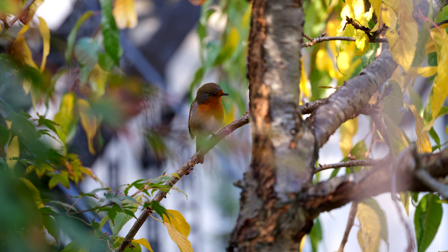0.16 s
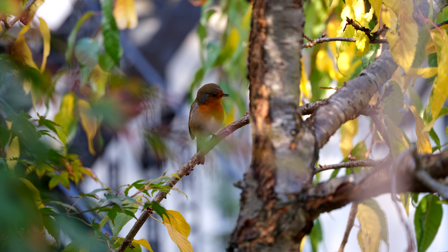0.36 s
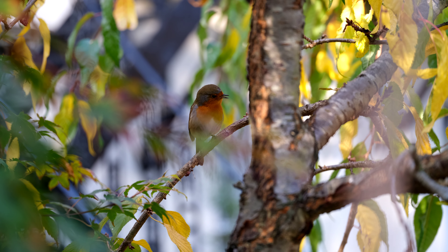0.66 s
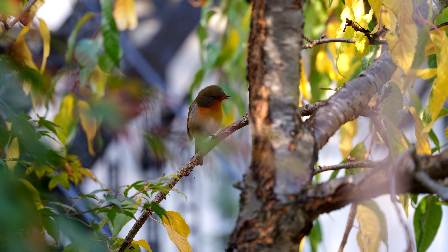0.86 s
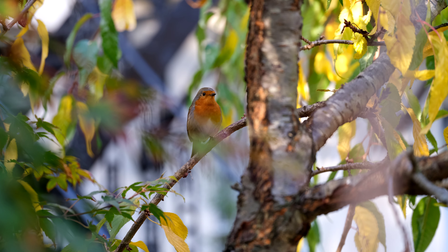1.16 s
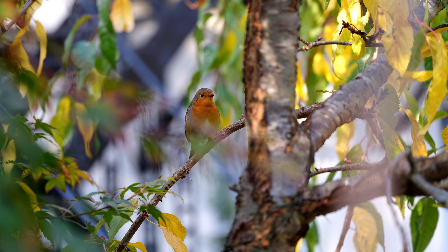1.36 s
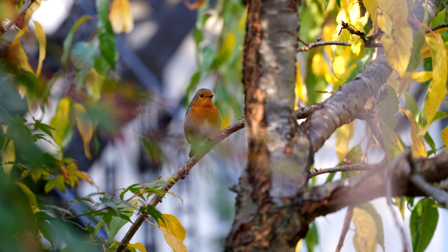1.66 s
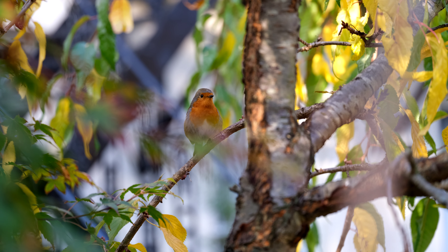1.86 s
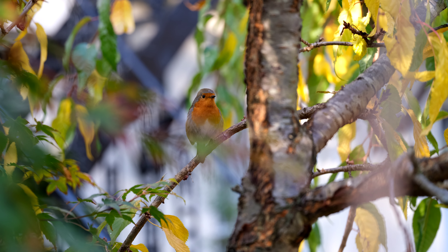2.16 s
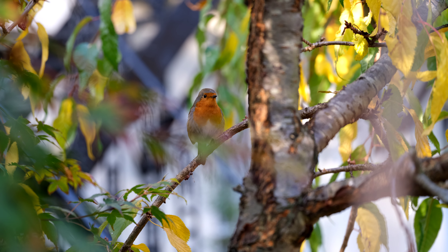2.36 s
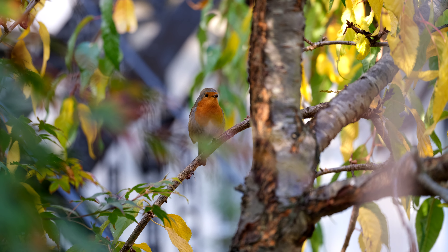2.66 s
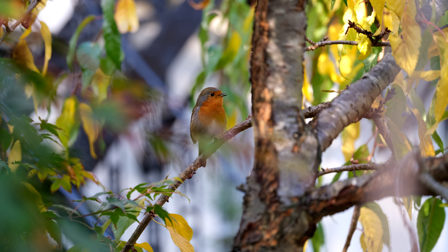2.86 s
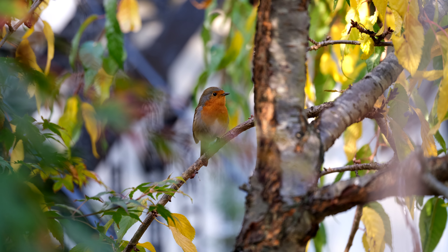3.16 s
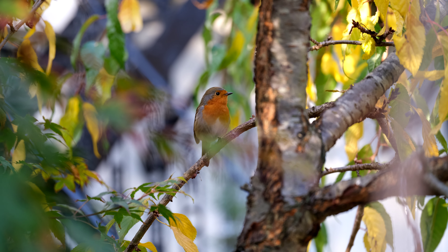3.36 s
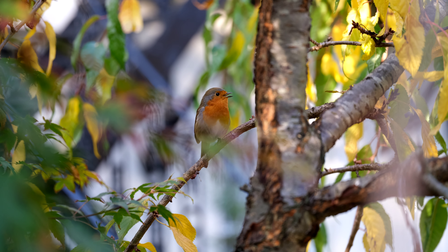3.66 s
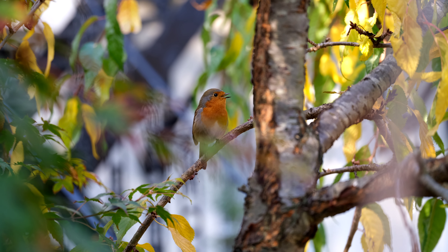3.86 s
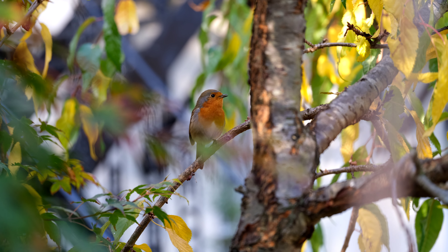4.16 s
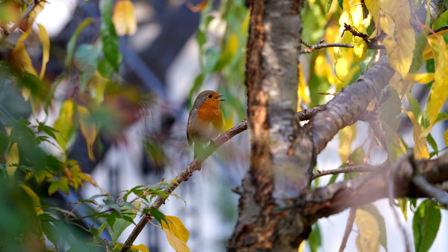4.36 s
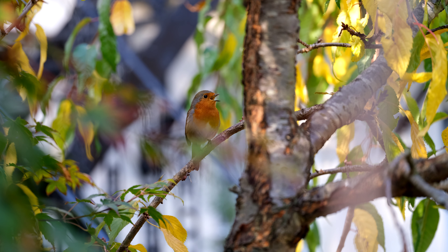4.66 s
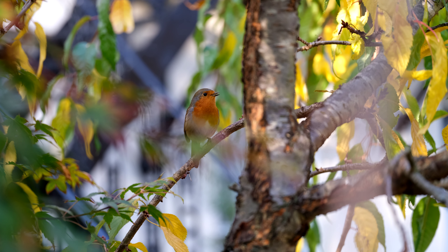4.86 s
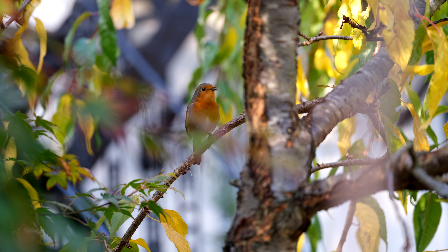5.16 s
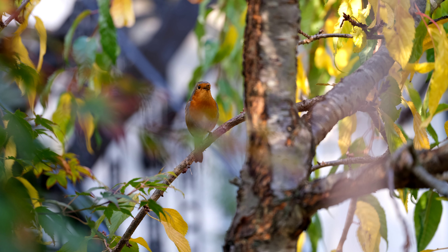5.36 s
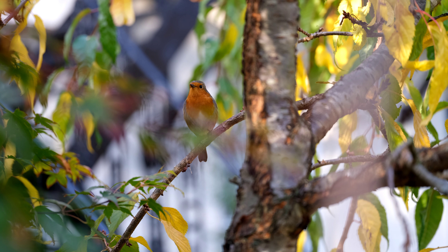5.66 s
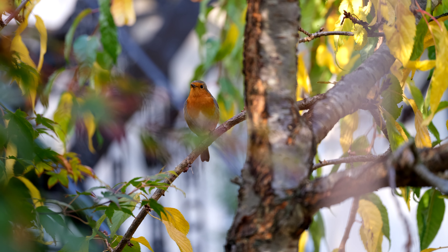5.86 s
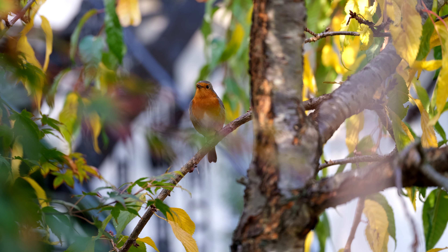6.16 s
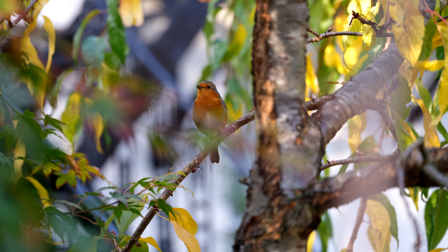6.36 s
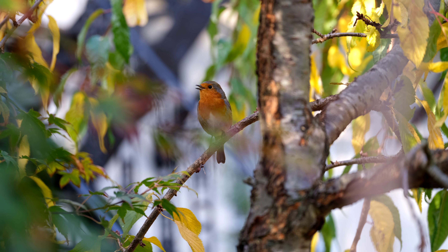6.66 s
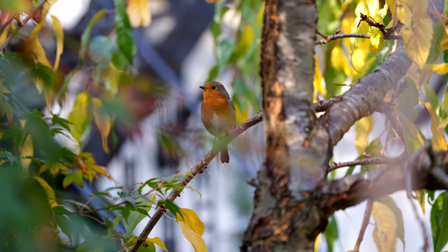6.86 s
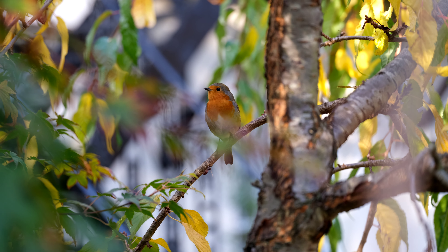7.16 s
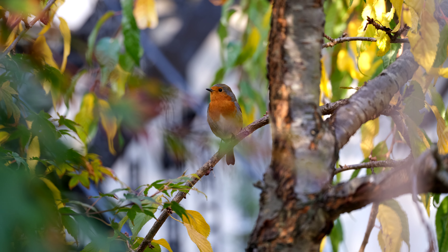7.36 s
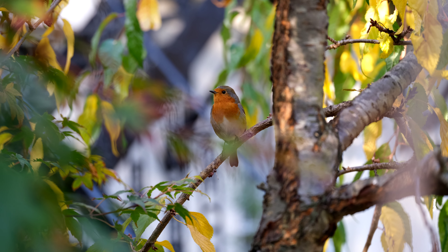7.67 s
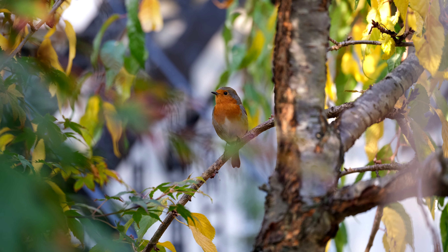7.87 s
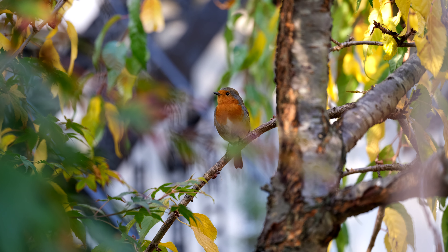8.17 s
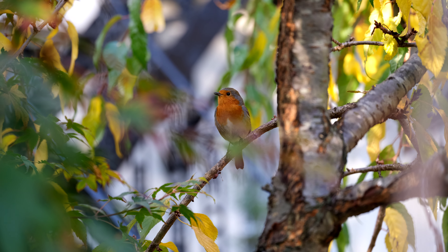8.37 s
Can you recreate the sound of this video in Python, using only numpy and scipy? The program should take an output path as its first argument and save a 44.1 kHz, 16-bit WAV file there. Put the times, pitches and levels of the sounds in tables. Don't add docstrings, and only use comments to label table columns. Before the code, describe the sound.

A robin a few metres away, slightly left, sings quick clipped whistles and squeaky twitters in short phrases separated by pauses. A thin high trill leads into a louder, lower warble, then a few sparse piping notes. Leaves and walls add light echo. Behind it lie steady traffic wash, a faint low idling engine, distant chirping birds and one far double boom, all picked up in stereo by a camera's microphones.

```python
import sys
import numpy as np
from scipy import signal
from scipy.fft import rfft, irfft
from scipy.io import wavfile
from scipy.ndimage import uniform_filter1d

SR = 44100
rng = np.random.default_rng(int(sys.argv[2]) if len(sys.argv) > 2 else 0)


def magnitude_from_level(level_db):
    exponent = np.asarray(level_db, float) / 20
    return 10 ** exponent


def persist_wave(psi):
    counts = np.round(np.clip(psi, -1, 1) * 32767).astype(np.int16)
    wavfile.write(sys.argv[1], SR, np.atleast_2d(counts).T)


N = 375732


def evened(x):
    return x / np.sqrt(np.mean(x ** 2) + 1e-20)


def read(points, hz):
    f, value = np.transpose(points)
    return np.interp(np.log(hz + 1), np.log(f + 1), value)


def slow(per_s, count):
    z = rfft(rng.standard_normal((count, N)))
    smooth = np.exp(-(np.fft.rfftfreq(N, 1 / SR) / per_s) ** 2)
    return evened(irfft(z * smooth, N))


def resonate(x, hz, width):
    turn = np.exp(2j * np.pi * np.cumsum(hz * np.ones(len(x))) / SR)
    r = np.exp(-np.pi * width / SR)
    return 2 * (turn * signal.lfilter([1 - r], [1, -r], x / turn)).real


def town():
    # (frequency [Hz], density [dB per Hz])
    wash_spectrum = [(25, -10.5), (66, -0.5), (134, -6.5), (500, -13), (900, -12.5), (1560, -14.5),
                     (2200, -13), (2500, -24), (3100, -24), (4000, -33.5), (6000, -36), (8500, -45),
                     (14700, -52.5), (16000, -66)]
    # (frequency [Hz], left-right likeness [-1..1])
    likeness = [(60, 0.95), (240, 0.9), (950, 0.56), (3770, 0.13), (15000, 0.01)]
    frames, hz = N // 256 + 5, np.fft.rfftfreq(1024, 1 / SR)
    a, b, c, d, patches = rng.standard_normal((frames, 513, 5)).T
    patches = uniform_filter1d(uniform_filter1d(patches, 12, 0), 20, 1)
    patches = evened(patches)
    same = np.clip(read(likeness, hz), -1, 1)[:, None]
    left = a + 1j * b
    right = same * left + np.sqrt(1 - same ** 2) * (c + 1j * d)
    z = np.array([left, right])
    z *= magnitude_from_level(read(wash_spectrum, hz)[:, None] + 0.69 * patches)
    wash = evened(signal.istft(z, nperseg=1024, noverlap=768)[1][:, :N])
    return magnitude_from_level(-46) * magnitude_from_level([[.3], [-.3]]) * wash


def engine():
    # (time [s], level [dB])
    idle = [
        (0, -51.5),
        (2.5, -44.5),
        (7.1, -49.5),
        (8.52, -41),
    ]
    throb = resonate(resonate(rng.standard_normal(N), 52, 17), 52, 17)
    level_db = np.interp(np.arange(N) / SR, *np.transpose(idle)) - 6.5
    return magnitude_from_level(level_db) * evened(throb)


def boom():
    # (time [s], thud level [dB], rattle over thud [dB], rise [s], t60 [s])
    blows = [
        (2.913, -36.5, -10.5, 0.0084, 3.05),
        (3.149, -40, 2, 0.13, 1.76),
    ]
    # (frequency [Hz], width [Hz], level [dB])
    modes = [(214, 160, 7.5), (141.5, 13.6, 0.5), (308.5, 450, -8)]
    echoes = rng.standard_normal((2, N)) * magnitude_from_level(1.2 * slow(50, count=2))
    thud = np.zeros(N)
    for f, width, db in modes:
        thud += magnitude_from_level(db) * evened(resonate(resonate(echoes[0], f, width), f, width))
    thud = evened(thud)
    rattle_band = signal.butter(3, [400, 1600], "band", fs=SR, output="sos")
    rattle = evened(signal.sosfilt(rattle_band, echoes[1]))
    out = np.zeros(N)
    for s, thud_db, rattle_db, rise_s, t60 in blows:
        age = np.maximum(np.arange(N) / SR - s, 0)
        roll = magnitude_from_level(thud_db - 60 * age / t60) * np.tanh(age / rise_s)
        out += roll * (thud + magnitude_from_level(rattle_db) * rattle)
    return out


def garden(x, gap_s, size=1):
    # (frequency [Hz], t60 [s])
    ringing = [(2000, 0.26), (4000, 0.58), (8000, 0.25)]
    taps = np.zeros((2, SR // 2))
    at = np.arange(0, SR // 2 - 20, 20) + rng.integers(0, 20, (2, (SR // 2 - 1) // 20))
    np.put_along_axis(taps, at, rng.choice([-1., 1.], at.shape), 1)
    taps *= np.arange(SR // 2) > gap_s * SR
    taps[1] = 0.087 * taps[0] + 1.02 * taps[1]
    hz, t, z = signal.stft(taps, SR, nperseg=128)
    decay = magnitude_from_level(-60 * t / (size * read(ringing, hz)[:, None]))
    tail = signal.istft(z * decay, SR, nperseg=128)[1]
    return signal.fftconvolve(x[None], tail / np.linalg.norm(tail[0]), axes=1)[:, :N]


def voice(turn, pitch, db, overtone_db):
    step_db = np.clip(-.5 * (db + 9.5), 2, 20)
    overtones = 0
    for k in range(2, 6):
        k_db = np.minimum(overtone_db, -30 if k > 2 else 0) + .4 * (db + 28) - step_db * (k - 2)
        overtones = overtones + magnitude_from_level(k_db) * np.cos(k * turn) * (k * pitch < SR / 2)
    return np.cos(turn) + overtones


def whistles(rows, edge_s, taper, flutter_db, waver, overtone_db, breakup=0):
    out = np.zeros(N)
    flutter, drift = slow(210, count=2)
    rasp = magnitude_from_level(-48.0) * rng.standard_normal(N)
    swell_db = 4
    for (s, length, *hz, db), start in zip(rows, rng.random(len(rows))):
        at = np.arange(round((s - edge_s) * SR), min(round((s + length + edge_s) * SR), N))
        glide = np.polyfit(np.linspace(0, 1, len(hz)), hz, len(hz) - 1)
        along = np.clip((at / SR - s) / length, -.06, 1.06)
        pitch = np.polyval(glide, along) * (1 + waver * drift[at])
        turn = 2 * np.pi * (np.cumsum(pitch) / SR + start)
        fade = signal.windows.tukey(len(at), np.clip(taper / (length + 2 * edge_s), 0, 1))
        wobble_db = flutter_db + breakup * np.clip(-23.5 - db, 0, 16)
        push_db = db + wobble_db * flutter[at] + swell_db * np.linspace(-.5, .5, len(at))
        out[at] += magnitude_from_level(push_db) * fade * (voice(turn, pitch, db, overtone_db[at]) + rasp[at])
    return out


def flock(count=480):
    # (time [s], level [dB])
    near_chirps = [
        (1.6626, -52),
        (1.7858, -56),
        (2.8155, -47.5),
        (6.94, -54),
    ]
    when, long, low, top, size = rng.random((count, 5)).T
    s = .01 + when * (N / SR - .1)
    db = np.minimum(-66 - 4 * np.log(size), -55)
    s[:len(near_chirps)], db[:len(near_chirps)] = np.transpose(near_chirps)
    low_hz = 1720 + 200 * low
    top_hz = 1920 + 380 * top ** 2
    rows = np.transpose([s, .022 + .025 * long, low_hz, top_hz, low_hz, db])
    song = whistles(rows, edge_s=.004, taper=0.0052, flutter_db=2.0, waver=0.0093,
                    overtone_db=np.full(N, -60.))
    return magnitude_from_level(5.5) * song + magnitude_from_level(-9.5) * garden(song, gap_s=0.0024)


def far_birds():
    # (time [s], length [s], start [Hz], end [Hz], level [dB])
    far_glides = [(0.31, 0.09, 8400, 7260, -66.5), (1.31, 0.5, 8050, 7640, -76),
                  (1.72, 0.24, 6250, 6290, -68), (4.05, 0.44, 6150, 6250, -67.5),
                  (4.48, 0.31, 5820, 5370, -69), (4.73, 0.16, 4780, 4950, -64.5),
                  (5.58, 0.093, 6900, 6650, -73), (5.68, 0.054, 6660, 5830, -61),
                  (5.73, 0.1, 6050, 6030, -74), (5.87, 0.057, 4680, 4600, -60),
                  (1.13, 0.14, 8400, 8200, -79), (5.97, 0.22, 5540, 5210, -66),
                  (6.96, 0.15, 6560, 6350, -70), (7.66, 0.31, 3394, 3460, -62.5),
                  (7.79, .12, 4540, 4350, -63.5), (7.94, 0.064, 4500, 4500, -63),
                  (8.05, 0.09, 4400, 3880, -63), (8.17, 0.067, 3780, 4080, -64)]
    # (time [s], level [dB])
    far_drops = [
        (1.9, -67),
        (2.06, -64.5),
        (2.22, -66),
        (5.82, -63),
        (7.15, -67),
        (7.29, -67),
        (7.449, -64),
        (7.64, -68.5),
    ]
    drops = [(s, 0.07, 6560, 4900, db) for s, db in far_drops]
    song = whistles(far_glides + drops, edge_s=.005, taper=.03, flutter_db=4.5, waver=.004,
                    overtone_db=np.full(N, -60.))
    return magnitude_from_level(-5) * song + magnitude_from_level(-2) * garden(song, gap_s=.003, size=.7)


def strokes():
    # (time [s], length [s], start [Hz], end [Hz], level [dB])
    rises = [(.223, 0.0098, 3470, 4400, -36.5), (.685, 0.017, 2510, 3560, -37.5),
             (.71, .009, 2870, 3780, -46), (.895, 0.0096, 2250, 4140, -44),
             (2.428, 0.017, 5370, 6630, -52.5), (2.554, 0.012, 5000, 5590, -34.5),
             (2.568, 0.014, 5460, 6260, -45), (2.771, 0.0065, 4930, 5400, -30),
             (2.78, 0.0073, 5660, 6500, -42), (2.807, .016, 3770, 4230, -38),
             (2.833, 0.015, 3110, 4380, -30), (2.847, 0.018, 3800, 5380, -30),
             (2.915, 0.014, 4040, 5770, -34.5), (2.93, 0.0069, 4980, 6060, -33.5),
             (2.938, 0.0066, 6070, 6900, -52), (3.027, 0.0093, 2520, 4300, -44.5),
             (3.04, .006, 4420, 4900, -43), (3.073, 0.0084, 4300, 5100, -42),
             (3.088, 0.0086, 2920, 3830, -53), (3.095, 0.018, 3960, 4900, -40.5),
             (3.748, 0.025, 4380, 4820, -32.5), (4.036, 0.016, 3880, 4470, -49),
             (5.122, 0.012, 2560, 3640, -38), (5.427, 0.011, 3270, 4420, -38),
                   (5.469, 0.014, 3170, 3400, -41), (5.35, 0.005, 3900, 4500, -40),
                   (5.562, 0.015, 2090, 3070, -43.5), (8.255, 0.068, 7250, 7860, -56.5),
                   (8.307, 0.01, 5050, 7650, -52)]
    # (time [s], length [s], start [Hz], end [Hz], level [dB])
    falls = [(.408, 0.012, 3260, 2550, -46.5), (.434, 0.0074, 4600, 3920, -51),
             (.495, 0.015, 6270, 4070, -44), (.605, 0.041, 4210, 3670, -54), (.7, 0.0074, 5280, 3120, -35),
             (.808, 0.016, 4170, 3640, -34.5), (.92, 0.035, 3870, 3150, -39.5),
             (.94, 0.059, 3100, 2450, -51.5), (1.017, 0.0256, 4760, 4600, -38.5),
             (1.043, 0.025, 4610, 4420, -40.5), (1.07, 0.018, 4340, 2820, -51.5),
             (3.697, 0.012, 4670, 4010, -23.5), (3.867, 0.016, 4740, 4320, -38),
                   (3.73, 0.0075, 4500, 4060, -28), (3.742, 0.028, 4260, 3840, -38.5),
                   (4.053, 0.013, 4280, 4010, -48), (5.355, 0.0067, 4240, 2970, -32),
                   (5.438, .012, 3480, 2620, -49), (5.537, .012, 3200, 2500, -49),
                   (5.578, 0.014, 3010, 2700, -50), (6.684, .016, 7400, 4620, -44),
                   (8.284, 0.021, 7600, 5600, -54)]
    # (time [s], length [s], start [Hz], end [Hz], level [dB])
    hooks_up = [(.232, 0.012, 2630, 3250, -30.5), (.606, 0.016, 3500, 3850, -47),
                (.9, 0.034, 4100, 4160, -43), (2.418, 0.03, 4100, 5430, -52),
                (2.765, 0.0135, 3810, 4900, -34), (3.653, 0.04, 4340, 4640, -40),
                (3.74, 0.0072, 4080, 4470, -26)]
    # (time [s], length [s], start [Hz], end [Hz], level [dB])
    hooks_down = [(0.24, 0.046, 3740, 2650, -45), (0.7, 0.012, 3430, 2960, -35),
                  (0.792, 0.013, 4900, 4280, -34.5), (3.822, 0.023, 4570, 4220, -31),
                  (5.377, 0.025, 3070, 2700, -42.5), (6.687, 0.019, 3760, 3210, -39),
                  (6.702, 0.024, 4780, 4660, -44)]
    # (time [s], length [s], start [Hz], end [Hz], level [dB])
    late = [
        (.681, 0.022, 4600, 5000, -39.5),
        (3.589, 0.014, 4450, 4250, -31),
        (3.605, 0.014, 4330, 4770, -32.5),
    ]
    # (time [s], length [s], edge [Hz], turning [Hz], level [dB])
    turns = [
        (0.694, .016, 7200, 8240, -61),
        (2.82, 0.015, 4120, 4980, -34.5),
        (3.807, 0.011, 4500, 4670, -33),
        (3.999, 0.038, 3920, 3290, -52),
        (4.07, 0.03, 3440, 3010, -55),
        (4.305, 0.053, 8640, 8240, -49),
        (8.317, 0.023, 6930, 7970, -43),
        (8.36, 0.027, 6060, 5430, -48.5),
    ]
    # (time [s], pitch [Hz], level [dB])
    pips = [
        (3.933, 4220, -43),
        (3.63, 4510, -37),
        (4.61, 7550, -35),
    ]
    # (time [s], length [s], pitch [Hz], level [dB])
    held = [(0.409, 0.016, 5840, -48), (2.863, 0.014, 6060, -42.5), (2.873, 0.035, 6050, -54),
            (3.967, 0.013, 3950, -38.5), (0.91, 0.0053, 3820, -28), (2.648, 0.009, 5800, -40),
            (3.034, 0.014, 4360, -39), (4.011, 0.028, 4000, -44.5), (3.899, 0.0086, 3930, -31.5),
            (4.341, .006, 7200, -49),
            (0.505, 0.0065, 4320, -30.5), (0.514, .008, 4270, -41), (0.563, .009, 3770, -42),
              (.594, 0.0057, 3210, -32), (2.487, .005, 3800, -53), (3.019, 0.0033, 4760, -46),
              (3.02, 0.0024, 2470, -43), (3.112, 0.02, 5280, -51.5), (3.711, .003, 4070, -25.5),
              (3.717, 0.0029, 4210, -22), (3.722, 0.0085, 4250, -27), (3.98, .01, 4200, -46),
              (4.074, 0.027, 3830, -47), (5.11, 0.0066, 2870, -41), (6.643, 0.011, 4700, -46),
              (6.675, .008, 6750, -51)]
    kinds = [(rises, 0.579),
             (falls, .52),
             (hooks_up + hooks_down, 0.88),
             (late, -0.026)]
    bent = []
    for rows, half in kinds:
        bent += [(s, long, a, a + half * (b - a), b, db) for s, long, a, b, db in rows]
    turned = [(s, long, edge, turn, edge, db) for s, long, edge, turn, db in turns]
    return bent + turned + held + [(s, 0.02, hz, db) for s, hz, db in pips]


def slurs(overtone_db):
    # (time [s], pitch [Hz], level [dB])
    opening = [
        [(0.49, 4260, -50), (0.5, 3730, -36), (0.507, 3390, -45), (0.515, 3530, -41), (0.54, 3900, -39),
         (0.553, 3650, -36), (0.56, 2630, -48), (0.566, 2320, -54)],
        [(0.568, 2390, -47.5), (0.576, 2940, -29), (0.583, 3420, -25.5), (0.59, 3220, -25)],
        [(2.497, 4300, -55), (2.505, 4530, -36.5), (2.514, 4800, -36)],
        [(2.5, 2670, -55), (2.508, 4290, -46), (2.515, 4570, -36), (2.523, 4250, -37), (2.532, 4370, -33),
         (2.54, 4020, -40), (2.552, 4220, -41)],
        [(2.633, 4600, -55), (2.645, 4840, -31), (2.66, 4760, -51)],
        [(3.775, 4530, -39), (3.78, 4370, -27), (3.79, 4370, -26.5)],
    ]
    # (time [s], pitch [Hz], level [dB])
    high = [
        [(4.235, 7570, -67), (4.25, 7970, -52), (4.272, 8000, -37), (4.29, 8300, -37), (4.303, 8340, -37)],
        [(4.292, 7400, -48), (4.31, 7590, -48), (4.33, 7640, -71)],
        [(4.376, 8550, -55), (4.4, 8190, -39.5), (4.42, 7970, -35), (4.455, 8070, -37), (4.468, 7800, -48)],
        [(4.46, 7280, -47), (4.478, 7250, -30.5), (4.497, 7160, -42), (4.508, 7130, -39), (4.516, 7210, -32),
         (4.536, 7200, -46)],
        [(4.512, 8270, -42), (4.525, 8070, -38), (4.539, 7970, -42), (4.545, 7510, -38), (4.556, 7240, -31.5),
         (4.577, 7160, -43), (4.583, 7170, -33), (4.595, 7280, -25.5), (4.604, 7170, -35)],
        [(4.612, 6870, -51), (4.635, 7050, -31), (4.653, 7090, -39)],
        [(4.646, 7940, -41), (4.655, 7850, -33), (4.666, 7600, -47)],
        [(4.672, 7660, -35), (4.685, 7700, -35), (4.701, 7760, -48), (4.72, 8050, -33), (4.735, 8300, -43),
         (4.748, 8300, -40)],
        [(4.69, 6830, -48), (4.71, 7260, -37), (4.73, 7520, -43), (4.75, 7810, -42.5), (4.765, 7780, -43),
         (4.785, 7920, -35), (4.805, 7960, -36), (4.826, 8000, -44)],
        [(4.787, 7450, -54), (4.805, 7450, -36.5), (4.828, 7420, -46)],
    ]
    # (time [s], pitch [Hz], level [dB])
    warble = [
        [(4.933, 3430, -37), (4.94, 2963, -22), (4.95, 3165, -20.5), (4.96, 3980, -22.5), (4.965, 3300, -20),
         (4.97, 3660, -19), (4.976, 3360, -24), (4.984, 3440, -25), (4.993, 3350, -26)],
        [(4.992, 3560, -31), (4.997, 4020, -23.5), (5.003, 4360, -30)],
        [(5.002, 3040, -39), (5.008, 3420, -22.5), (5.016, 3420, -28), (5.022, 3900, -26.5), (5.028, 3890, -26)],
        [(5.052, 2800, -47), (5.058, 2906, -21.5), (5.066, 3040, -25.5), (5.078, 3030, -38)],
        [(5.14, 2585, -41), (5.147, 3590, -21), (5.156, 3586, -18.5), (5.162, 3850, -15), (5.166, 3580, -18.5),
         (5.173, 2660, -45)],
        [(5.171, 3410, -25), (5.176, 3810, -23), (5.183, 3960, -20.5), (5.188, 4470, -42)],
        [(5.239, 2340, -48), (5.246, 3380, -24), (5.251, 3860, -22.5), (5.257, 3980, -26), (5.264, 3840, -39)],
        [(5.298, 2164, -43), (5.306, 2960, -25.5), (5.318, 3576, -29), (5.324, 3406, -24.5), (5.33, 3665, -21),
         (5.339, 3705, -20), (5.342, 4050, -21), (5.345, 3765, -21), (5.351, 3670, -27.5)],
        [(5.401, 3575, -34), (5.408, 3735, -19.5), (5.419, 3960, -36), (5.424, 3880, -31), (5.433, 4280, -35),
         (5.45, 4080, -45), (5.468, 3760, -41)],
        [(5.452, 2660, -51), (5.495, 2800, -48), (5.507, 2630, -46), (5.52, 3420, -45), (5.526, 3880, -31),
         (5.533, 3930, -32), (5.54, 3850, -49)],
        [(5.55, 3760, -47), (5.562, 3680, -34.5), (5.595, 3580, -62)],
    ]
    # (time [s], pitch [Hz], level [dB])
    closing = [
        [(5.964, 5120, -67), (5.972, 6750, -59), (6.01, 7660, -47), (6.04, 7680, -34), (6.048, 7450, -35),
         (6.053, 6800, -28), (6.06, 7080, -41), (6.066, 7770, -32), (6.073, 5330, -60)],
        [(6.19, 4580, -56), (6.197, 6940, -53), (6.215, 7400, -53), (6.235, 7470, -39.5), (6.246, 7360, -45)],
        [(6.256, 7200, -39), (6.261, 7470, -37), (6.266, 7700, -38)],
        [(6.272, 7590, -50), (6.29, 7740, -40), (6.302, 7750, -34), (6.31, 6940, -36)],
        [(6.362, 3480, -64), (6.371, 5150, -42), (6.383, 5220, -38), (6.4, 5210, -46)],
        [(6.408, 5140, -51), (6.422, 4860, -43), (6.44, 4700, -26.5), (6.445, 4380, -38), (6.45, 3440, -34.5),
         (6.462, 3570, -49)],
        [(6.479, 4540, -48), (6.494, 4640, -32.5), (6.508, 4630, -34.5), (6.52, 4590, -46)],
        [(6.599, 2800, -58), (6.609, 4190, -41), (6.62, 4160, -32.5), (6.641, 4150, -33), (6.646, 4230, -38),
         (6.665, 3520, -38), (6.685, 3310, -38), (6.702, 2500, -50)],
    ]
    edge_s, round_s, waver_hz, flutter_db = 0.0017, .0015, 15, 1.16
    out = np.zeros(N)
    flutter, drift = slow(220, count=2)
    rasp = magnitude_from_level(-45.5) * rng.standard_normal(N)
    soft = int(round_s * SR) + 1
    for rows in opening + high + warble + closing:
        s, hz, db = np.transpose(rows)
        t = np.arange(round((s[0] - edge_s) * SR), round((s[-1] + edge_s) * SR))
        pitch = uniform_filter1d(np.interp(t / SR, s, hz), soft) + waver_hz * drift[t]
        push = uniform_filter1d(np.interp(t / SR, s, magnitude_from_level(db / 2)), soft) ** 2
        wobble_db = flutter_db + .08 * np.clip(-30 - 20 * np.log10(push), 0, 20)
        push = push * magnitude_from_level(wobble_db * flutter[t])
        fade = signal.windows.tukey(len(t), min(4 * edge_s * SR / len(t), 1))
        turn = 2 * np.pi * np.cumsum(pitch) / SR
        out[t] += push * fade * (voice(turn, pitch, 20 * np.log10(push), overtone_db[t]) + rasp[t])
    return out


def robin():
    # (time [s], left over right [dB], octave overtone [dB])
    phrases = [(0, 2, -37), (2.3, 7.5, -31), (3.5, 4, -35), (4.2, 8, -25), (4.9, 3, -47), (5.9, 7.5, -37),
               (6.34, 6, -19), (6.42, 16, -45), (6.443, 6, -15), (6.47, 23, -44), (6.58, 9, -47),
               (6.652, 5, -18.5), (8.2, 4, -24)]
    # (time [s], length [s], start [Hz], end [Hz], level [dB])
    buzzes = [(.236, 0.025, 4200, 3430, -49), (.593, 0.03, 3300, 3440, -41),
              (.597, 0.029, 4400, 4000, -44.5), (.608, 0.026, 2890, 2790, -43),
              (.69, 0.024, 6200, 6600, -53.5), (.702, 0.018, 4970, 4600, -44),
              (6.438, .008, 6900, 6830, -53), (2.515, 0.04, 4290, 4330, -42.5),
              (2.85, 0.028, 4000, 4180, -47), (2.935, 0.022, 5070, 5120, -44),
              (5.19, 0.027, 3800, 3750, -49), (5.36, 0.023, 3700, 3830, -39),
              (6.69, 0.025, 6800, 6000, -56)]
    s, lean_db, overtone_db = np.transpose(phrases)
    phrase = np.searchsorted(s, np.arange(N) / SR, "right") - 1
    overtone_db = overtone_db[phrase]
    song = whistles(strokes(), edge_s=.003, taper=.012, flutter_db=.9, waver=.005,
                    overtone_db=overtone_db, breakup=0.15)
    song = song + whistles(buzzes, edge_s=.003, taper=.015, flutter_db=5, waver=.045,
                           overtone_db=overtone_db)
    song = song + magnitude_from_level(0.55) * slurs(overtone_db)

    lag = -2j * np.pi * np.fft.rfftfreq(N, 1 / SR)
    bounce = 1 - .4 * np.exp(lag / 1550)
    right = irfft(rfft(song) * bounce * np.exp(lag * -.000016), N)
    lean = magnitude_from_level(lean_db[phrase] / 2)
    ports = np.array([song * lean, right / lean])

    song = song * magnitude_from_level(4 * (np.arange(N) < 1.2 * SR))
    leaves = garden(song * (1 + .4 * slow(100, count=1)[0]), gap_s=0.007, size=.3)
    walls = garden(song * slow(200, count=1)[0], gap_s=0.012)
    return ports + magnitude_from_level(-15) * leaves + magnitude_from_level(-16.5) * walls


def scene():
    far_boom = boom() * magnitude_from_level([[.5], [-.5]])
    return town() + engine() + far_boom + flock() + far_birds() + robin()


def low_pass(x):
    return signal.sosfilt(signal.butter(12, 16120, fs=SR, output="sos"), x)


def record(dry):
    return low_pass(dry)


dry = scene()
out = record(dry)
persist_wave(out)
```